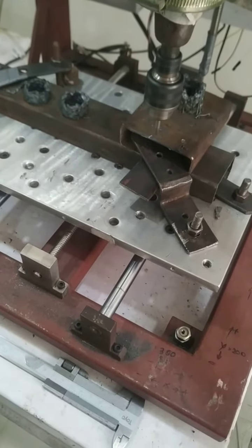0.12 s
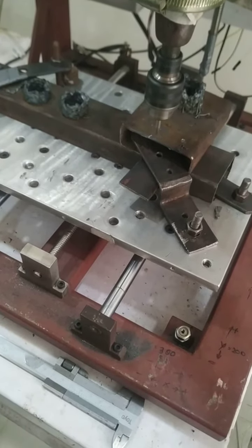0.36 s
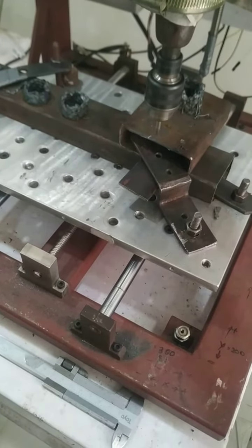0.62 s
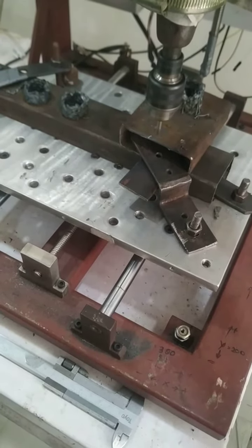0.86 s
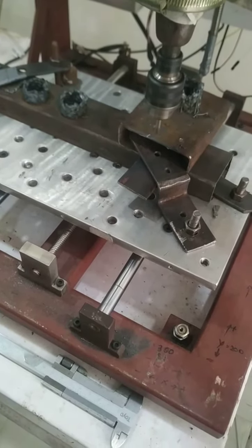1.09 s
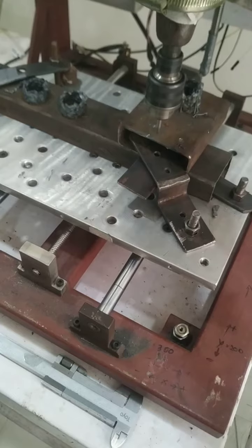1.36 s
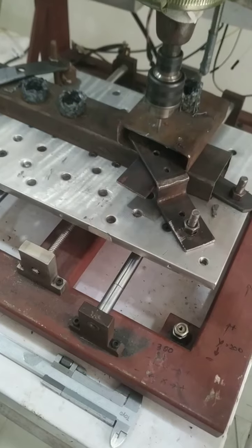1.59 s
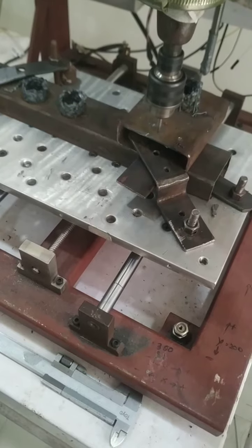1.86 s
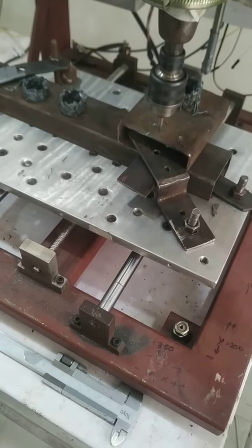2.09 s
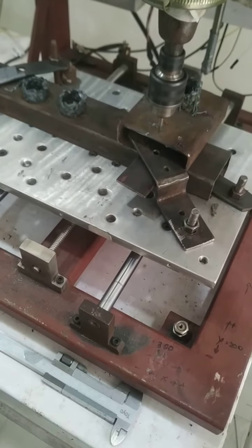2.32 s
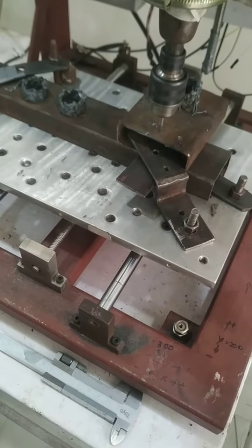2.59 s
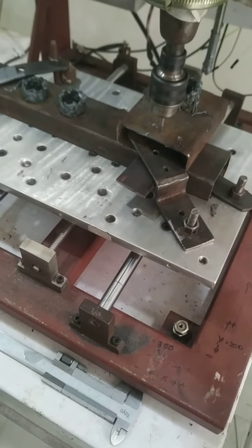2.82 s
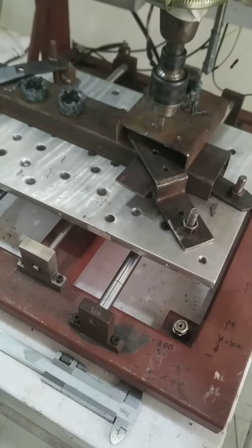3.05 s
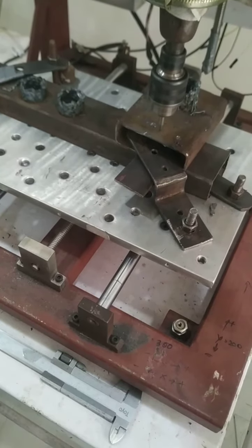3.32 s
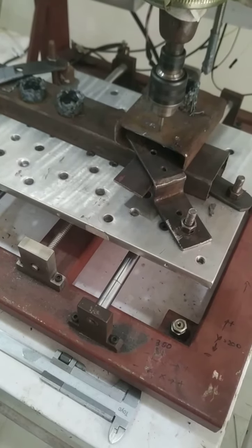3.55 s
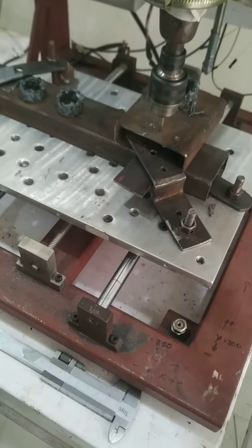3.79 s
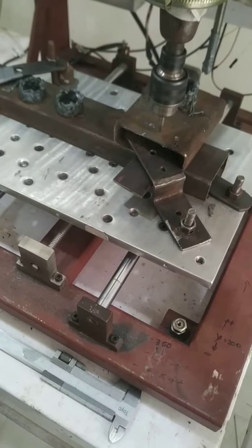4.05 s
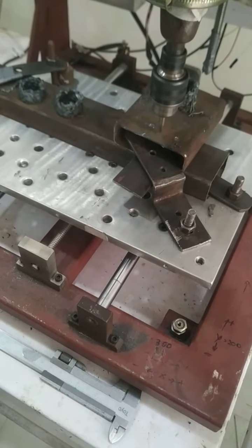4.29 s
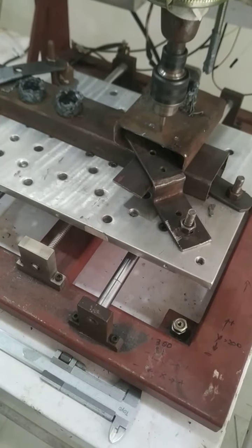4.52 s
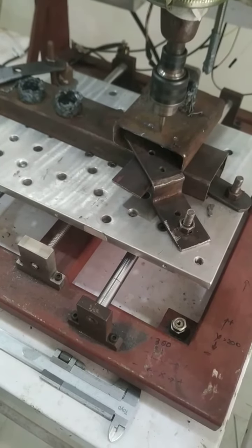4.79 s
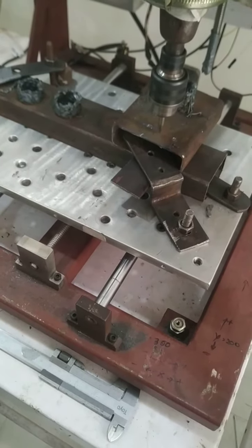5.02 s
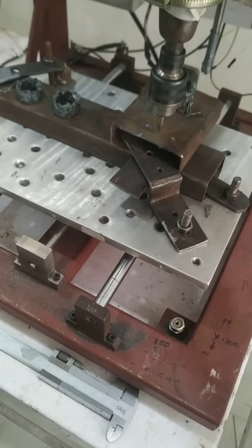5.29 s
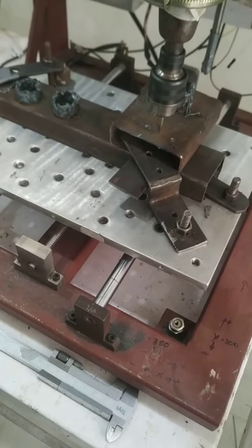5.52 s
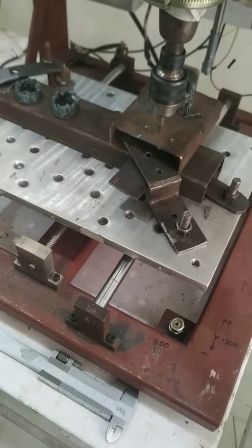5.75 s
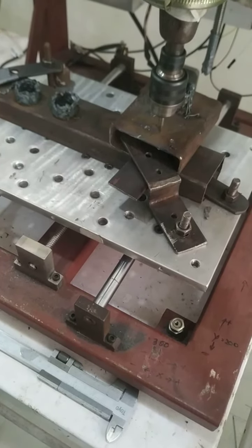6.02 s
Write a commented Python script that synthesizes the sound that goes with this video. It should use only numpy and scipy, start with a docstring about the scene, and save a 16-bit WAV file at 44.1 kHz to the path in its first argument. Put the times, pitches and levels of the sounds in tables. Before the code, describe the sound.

Close, continuous drill drone: a buzzing whine around 433 Hz, rough gearbox noise and airy hiss, slightly uneven, swelling near the end.

```python
"""Hand drill cutting steel

A hand-drill motor, clamped in a steel frame, drives a small bit into steel in a workshop, half a metre
from two microphones. The armature (the spinning core) sings a stack of sines at whole multiples of its
speed; a ball bearing adds blurred sines between them. The gearbox growls and the cooling fan hisses:
both are noise that pulses with each turn. A few soft, low bumps come from a shifting hand."""
import sys
import numpy as np
from scipy import signal
from scipy.fft import rfft, irfft, next_fast_len
from scipy.io import wavfile
from scipy.ndimage import uniform_filter1d, map_coordinates

SR = 44100
rng = np.random.default_rng(int(sys.argv[2]) if len(sys.argv) > 2 else 0)


def log_audio(samples):
    """Write samples as a 16-bit WAV file to the path given in sys.argv[1]."""
    # one column per channel
    frames = np.atleast_2d(samples).T
    # limit to full scale, then quantise
    limited = np.clip(frames, -1, 1)
    pcm = np.round(limited * 32767).astype(np.int16)
    wavfile.write(sys.argv[1], SR, pcm)


def ratio(d):
    """dB to gain"""
    e = np.asarray(d, float) / 20
    return 10 ** e


N = 270328  # length [samples]

# armature tones, before swell and waver:
# (order [cycles per turn], left level [dB], right level [dB], left's phase lead [radians])
ARMATURE_TONES = [(1, -21.7, -39.0, -0.9), (2, -27.9, -37.0, -2.0), (3, -30.2, -38.8, 2.2),
                  (4, -37.1, -39.1, -2.2), (5, -42.2, -41.5, 1.0), (6, -37.8, -35.9, -1.0),
                  (7, -40.0, -39.0, 2.2), (8, -35.8, -39.0, -1.5), (9, -35.2, -45.5, -1.7),
                  (10, -36.0, -40.4, 2.9), (11, -36.7, -37.9, 1.6), (12, -33.8, -40.7, 3.1),
                  (13, -35.7, -36.9, 2.0), (14, -33.3, -38.7, -1.3), (15, -38.1, -34.6, 3.0),
                  (16, -41.7, -44.3, 0.4), (17, -37.6, -35.8, 0.3), (18, -41.3, -39.1, -2.8),
                  (19, -49.6, -43.2, -0.0), (20, -37.2, -38.4, -2.9), (21, -48.6, -36.2, -0.5),
                  (22, -48.6, -40.4, 0.5), (23, -39.5, -30.8, -1.0), (24, -47.5, -32.7, 2.4),
                  (25, -40.9, -33.2, 3.1), (26, -48.1, -38.4, 2.9), (27, -44.0, -31.5, 1.4),
                  (28, -42.0, -43.5, 0.1), (29, -43.7, -43.5, 1.8)]
# bearing and gear tones, before swell and waver:
# (order [cycles per turn], left level [dB], right level [dB], left's phase lead [radians])
BEARING_TONES = [(0.075, -58.4, -65.5, -0.1), (0.121, -55.9, -64.5, -0.1), (0.266, -55.4, -60.7, -0.0),
                 (0.37, -56.6, -62.8, -0.0), (0.527, -57.3, -67.4, -0.2), (1.112, -47.2, -54.6, -1.9),
                 (1.598, -50.6, -54.4, -1.8), (1.745, -37.8, -44.1, -1.7), (2.257, -44.8, -47.0, -3.0),
                 (2.596, -42.2, -53.5, 2.1), (3.172, -46.4, -51.4, 2.1), (3.37, -47.2, -54.1, 2.2),
                 (3.598, -45.3, -48.4, 1.8), (3.91, -46.7, -40.3, 1.8), (4.63, -46.1, -47.9, 1.9),
                 (4.747, -46.2, -52.0, 1.6), (5.396, -44.9, -48.0, 0.0), (5.711, -51.7, -44.1, -0.1),
                 (6.594, -40.3, -46.9, -1.7), (6.715, -35.7, -43.2, -1.2), (7.458, -37.2, -40.9, 3.1),
                 (9.631, -44.9, -51.4, 0.0), (9.742, -45.0, -47.0, -1.2), (10.254, -38.4, -44.9, -0.7),
                 (10.621, -46.4, -43.8, 2.0), (11.743, -41.1, -37.4, -0.5), (16.59, -43.0, -44.8, 1.2),
                 (17.346, -43.8, -35.0, -0.9), (17.625, -44.6, -46.6, -2.5), (18.067, -40.8, -33.7, -0.9)]
# gearbox noise, before colouring and pulsing:
# (frequency [Hz], left level [dB per Hz], right level [dB per Hz])
GROWL_SPECTRUM = [(30, -72, -81), (85, -83.5, -84), (162, -71, -79.5), (296, -69.5, -76.5),
                  (382, -66.5, -77.5), (563, -72.5, -72.5), (646, -63.5, -65), (905, -65, -65.5),
                  (1230, -61.5, -67), (1530, -60, -63.5), (2030, -63.5, -64.5), (2480, -57, -59.5),
                  (2460, -62.5, -60), (3050, -54.5, -65.5)]
# fan noise, before colouring and pulsing:
# (frequency [Hz], left level [dB per Hz], right level [dB per Hz])
HISS_SPECTRUM = [(3300, -58, -58), (3900, -61, -62), (4900, -57, -56.5), (5900, -59.5, -60),
                 (6400, -58, -57.5), (7050, -60, -60), (7600, -56.5, -56), (8100, -58, -55.5),
                 (8600, -57.5, -55), (9500, -60, -56), (11600, -60, -56.5), (13100, -65.5, -63.5),
                 (14900, -60, -57.5), (15700, -60.5, -59)]
# how the noise differs between the microphones, lead counted beyond the path delay:
# (frequency [Hz], likeness [0-1], left's phase lead [radians])
STEREO_LIKENESS = [(100, 0.77, 0.2), (450, 0.67, 0.4), (910, 0.54, .5), (2390, 0.48, 1.47),
                   (2820, 0.05, -0.2), (3410, 0.42, 0.66), (4530, 0.23, -1.55), (6000, 0.45, -0.8),
                   (6680, 0.3, -2), (7900, 0.4, -0.5), (8340, 0.85, -3.5), (9230, 0.32, -1.5),
                   (12150, 0.4, -1.7), (13300, 0, 5)]
# soft bumps, before they die away: (time [s], right level [dB])
BUMP_TIMES = [(1.552, -37), (1.912, -39), (1.999, -37), (3.399, -37), (6.064, -38)]
# housing and table resonances, and hollows between them, that colour the noise:
# (frequency [Hz], width [Hz], boost [dB])
HOUSING_MODES = [(2480, 120, 3), (2600, 60, 3), (2780, 120, -2), (3130, 120, -2), (2870, 60, 3),
                 (3230, 80, 3), (3480, 80, 3), (3680, 300, -4.5), (4220, 120, 3), (4570, 120, -3),
                 (4800, 100, 1), (4930, 40, 4), (5330, 120, 3), (5950, 100, -2.2), (6800, 120, 2.2),
                 (7080, 170, -5), (7200, 60, 3), (8570, 120, 3), (8900, 60, 2.2), (9230, 60, 3),
                 (10600, 100, 3), (12020, 120, -3), (12160, 70, 4), (12580, 80, 3), (13170, 50, 4),
                 (13450, 50, 5), (13990, 150, -3), (14310, 70, 2.5), (15190, 50, 3)]
# the motor creeps faster as it runs in, and sags when the bit bites:
# (time [s], speed [armature turns per second])
MOTOR_SPEED = [(0.0, 432.97), (0.55, 433.14), (1.0, 433.03), (1.6, 433.55), (2.25, 433.74), (2.65, 434.1),
               (3.1, 434.15), (4.0, 434.41), (4.2, 434.53), (4.5, 434.53), (5.25, 434.81), (5.62, 434.73),
               (5.95, 434.54), (6.13, 434.55)]
# how hard the bit bites: (time [s], load [dB])
BIT_LOAD = [(0.0, 0.3), (0.55, 0.8), (1.3, -0.6), (2.5, 0.5), (3.9, 0), (4.3, 0), (4.65, 0.5), (5.3, -2.5),
            (5.6, -0.5), (5.85, 3.5), (6.13, 2)]
# how much armature orders 1, 2 and 3 follow the load: one (swell [dB per dB of load]) each
ORDERS_FOLLOW_LOAD = [0.25, 1, 0.9]
# one swell for the two lowest bearing tones, then one for the third:
# (time of the top [s], half width [s], resting level [dB], rise [dB])
LOW_TONE_SWELLS = [(2.0, 0.55, -3, 8), (5.1, 0.7, -1.5, 7)]

AIR_FOLLOWS_LOAD = 0.21  # swell of growl and hiss [dB per dB of load]
LEFT_DELAY = 0.000488  # extra path of the noise to the left microphone [s]
CAGE_ORDER = 0.371  # turns of the ball cage per armature turn
CROSS_HZ = 3060  # growl hands over to hiss here [Hz]
LEAD_DRIFT = 0.3  # phase drift between the microphones [radians per dB of waver]


def curves(rows):
    """One value per sample for each column after the time."""
    s, *columns = np.transpose(rows)
    t = np.arange(N) / SR
    return [np.interp(t, s, column) for column in columns]


def wobble(rate):
    """A smooth random curve through `rate` random points a second."""
    points = rng.standard_normal(int(N * rate / SR) + 4)
    coarse = map_coordinates(points, [np.arange(0, N + 32, 32) * rate / SR])  # every 32 samples
    return np.interp(np.arange(N), np.arange(len(coarse)) * 32, coarse)


def turns():
    """Angle of the armature in radians: its speed added up over time."""
    speed = curves(MOTOR_SPEED)[0]
    return 2 * np.pi * np.cumsum(speed) / SR


def tone(angle, left_db, right_db, lead, waver_db, rate):
    """One sine at both microphones; the room lets each side waver partly on its own."""
    shared_db = waver_db * wobble(rate)
    lead = lead + LEAD_DRIFT * waver_db * wobble(1.5)  # the microphones sway
    sides = []
    for db, side in ((left_db, 1), (right_db, -1)):
        own_db = 1.23 * waver_db * wobble(rate)
        level = ratio(db + shared_db + own_db) * np.sqrt(2)  # table levels are rms
        sides.append(level * np.sin(angle + side * lead / 2))
    return np.array(sides)


def patchy_noise(patchy_db):
    """Two noises whose strength varies at random in patches of time and frequency."""
    z = signal.stft(rng.standard_normal((2, N + 512)), nperseg=512)[2]
    patches = uniform_filter1d(rng.standard_normal(z.shape[1:]), size=2, axis=0)
    patches = uniform_filter1d(patches, size=20, axis=1)
    gain = ratio(patchy_db * patches / patches.std())
    return signal.istft(z * gain, nperseg=512)[1][:, :N]


def rush(spectrum, band, patchy_db):
    """Stereo noise coloured by the housing; the path to the left microphone makes that side late."""
    m = next_fast_len(N)
    hz = np.fft.rfftfreq(m, 1 / SR)

    def read(rows):
        knot_hz, *columns = np.transpose(rows)
        return np.array([np.interp(np.log(hz + 1), np.log(knot_hz), column) for column in columns])

    alike, lead = read(STEREO_LIKENESS)
    # sum and difference of two noises are as alike as this mixing angle says
    mix = np.arccos(np.clip(alike, 0, 1)) / 2
    a, b = patchy_noise(patchy_db)
    common = rfft(a, m) * np.cos(mix)
    apart = rfft(b, m) * np.sin(mix)
    late = np.exp(1j * (lead - 2 * np.pi * hz * LEFT_DELAY))
    housing_db = sum(db / (1 + (2 * (hz - mode_hz) / width_hz) ** 2)
                     for mode_hz, width_hz, db in HOUSING_MODES)
    colour = ratio(housing_db + read(spectrum)) * band(hz) * np.sqrt(SR / 2)
    return irfft(colour * np.array([(common + apart) * late, common - apart]), m)[:, :N]


def bumps():
    """A hand shifts: each bump is a low swing that slows from 60 Hz as it dies away."""
    t = np.arange(SR // 4) / SR
    swing = np.sin(2 * np.pi * 60 * t * np.exp(-t / 0.15))
    out = np.zeros(N + SR)
    for s, db in BUMP_TIMES:
        out[round(s * SR):][:len(t)] += ratio(db - 60 * t / 0.12) * swing
    return out[:N] * ratio(np.array([[-9], [0]]))  # left is 9 dB weaker


def gears_and_fan():
    """Gearbox and fan noise pulses with each turn; the hiss also beats with the ball cage."""
    angle = turns()
    once = 1 + 0.062 * np.cos(angle)
    turn = 1 + 0.06 * np.cos(angle) + 0.035 * np.cos(2 * angle + 1.6)
    cage_angle = CAGE_ORDER * angle
    cage = 1 + 0.024 * np.cos(cage_angle) + 0.053 * np.cos(2 * cage_angle)

    def low(hz):
        return np.clip((CROSS_HZ + 150 - hz) / 300, 0, 1)  # 300 Hz wide crossfade

    growl = rush(GROWL_SPECTRUM, lambda hz: np.sqrt(low(hz)) * (hz > 18), patchy_db=0.9)
    hiss = rush(HISS_SPECTRUM, lambda hz: np.sqrt(1 - low(hz)), patchy_db=2.0)
    load_db = AIR_FOLLOWS_LOAD * curves(BIT_LOAD)[0]
    chips_db = 0.1 * wobble(8.3) + 0.42 * wobble(40)  # the cut is uneven
    air = ratio(0.4) * growl * once + ratio(-0.07) * hiss * turn * cage
    return ratio(load_db + chips_db) * air


def bearing():
    """The balls slip, so these tones drift in phase and strength; the lowest three each swell once."""
    t = np.arange(N) / SR
    rumble_db, hum_db = [rest_db + rise_db / (1 + ((t - top_s) / width_s) ** 2)
                         for top_s, width_s, rest_db, rise_db in LOW_TONE_SWELLS]
    swells = rumble_db, rumble_db, hum_db
    angle = turns()
    out = 0
    for row, (order, left_db, right_db, lead) in enumerate(BEARING_TONES):
        swell_db = swells[row] if row < len(swells) else 0
        start = rng.uniform(0, 2 * np.pi)
        slip = start + (0.25 + 0.045 * order) * wobble(12)  # radians
        sound = tone(order * angle + slip, left_db, right_db, lead, waver_db=1.8, rate=18)
        out = out + ratio(swell_db) * sound
    return out


def armature():
    """Unbalance, commutator bars and fan blades repeat every turn: sines on whole orders."""
    load_db = curves(BIT_LOAD)[0]
    swells = [share * load_db for share in ORDERS_FOLLOW_LOAD]
    # the speed hunts slightly, so high orders blur more
    angle = turns() + 0.008 * wobble(10)
    out = 0
    for row, (order, left_db, right_db, lead) in enumerate(ARMATURE_TONES):
        swell_db = swells[row] if row < len(swells) else 0
        waver_db = np.clip(0.15 * order, 0, 2.0)  # high orders are the least steady
        start = rng.uniform(0, 2 * np.pi)
        sound = tone(order * angle + start, left_db, right_db, lead, waver_db, rate=14)
        out = out + ratio(swell_db) * sound
    return out


def scene():
    """Everything at the two microphones."""
    return bumps() + gears_and_fan() + bearing() + armature()


def band_limit(x):
    """A steep low-pass at the top of the band."""
    return signal.sosfilt(signal.butter(12, 15720, fs=SR, output="sos"), x)


def record(dry):
    """The recorder keeps nothing from 15720 Hz up."""
    m = next_fast_len(N)
    keep = np.fft.rfftfreq(m, 1 / SR) < 15720
    mix = irfft(rfft(dry, m) * keep, m)[:, :N]
    return band_limit(mix)


dry = scene()
out = record(dry)
log_audio(out)
```